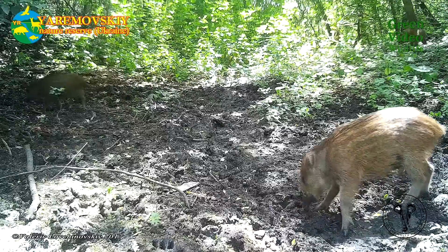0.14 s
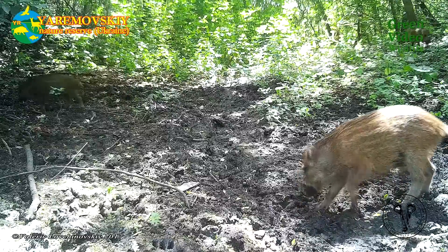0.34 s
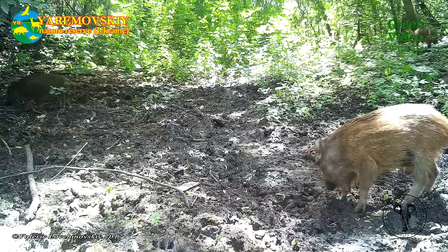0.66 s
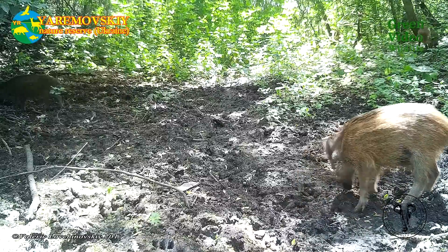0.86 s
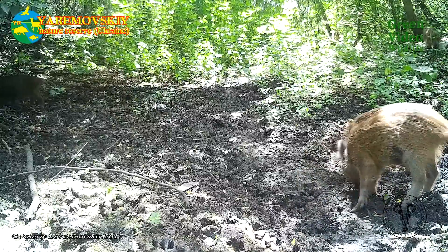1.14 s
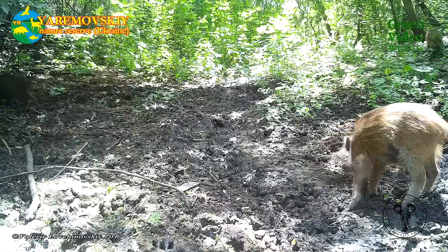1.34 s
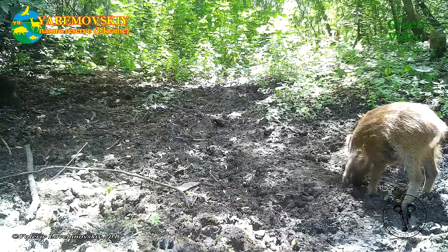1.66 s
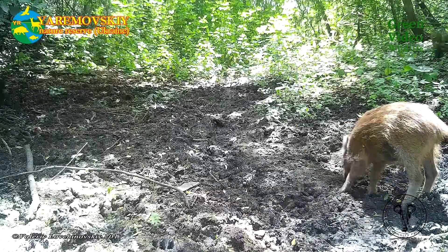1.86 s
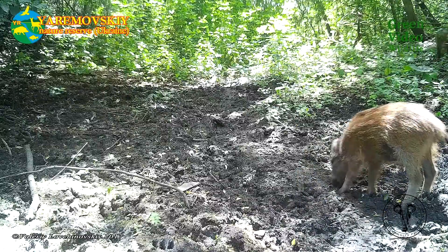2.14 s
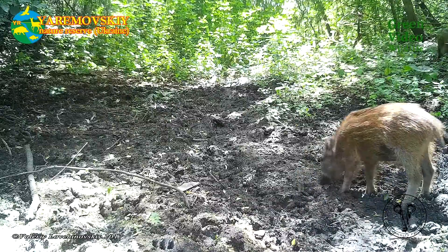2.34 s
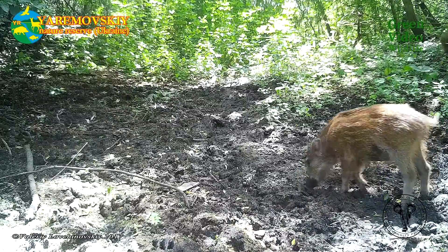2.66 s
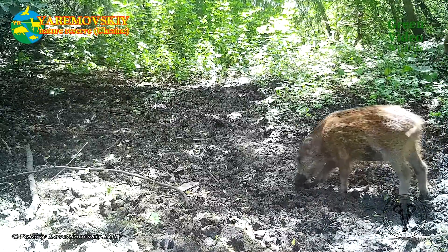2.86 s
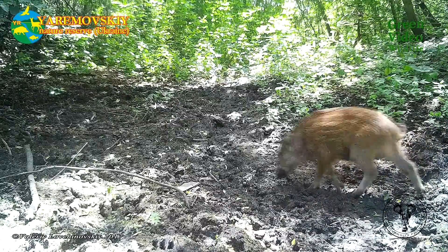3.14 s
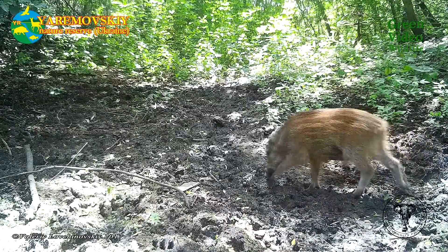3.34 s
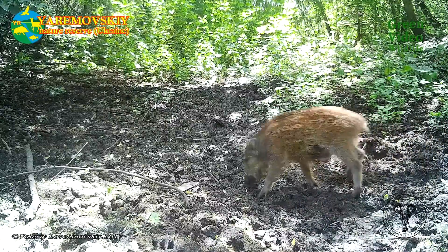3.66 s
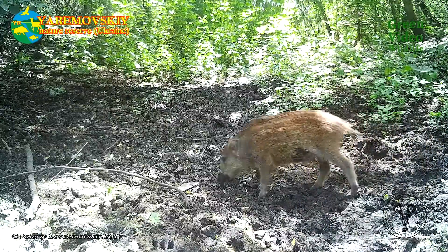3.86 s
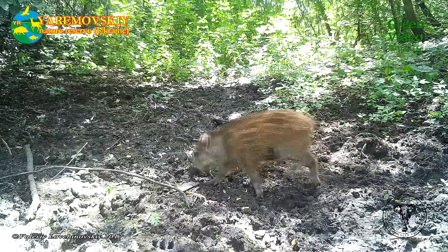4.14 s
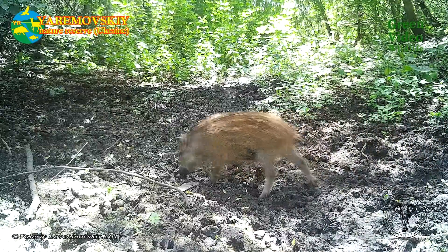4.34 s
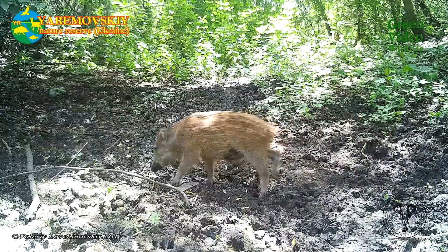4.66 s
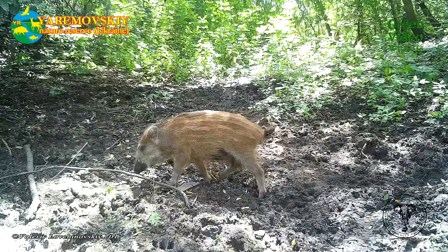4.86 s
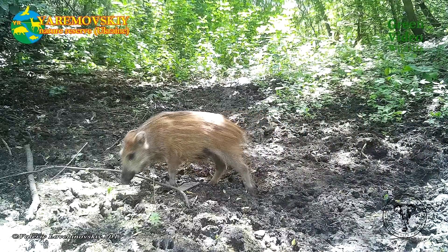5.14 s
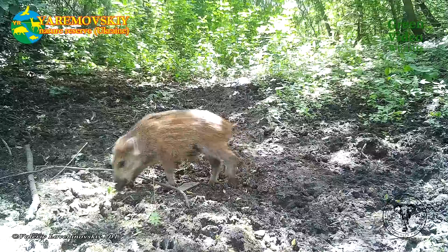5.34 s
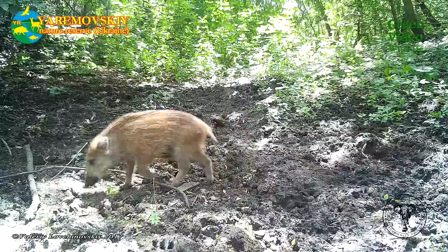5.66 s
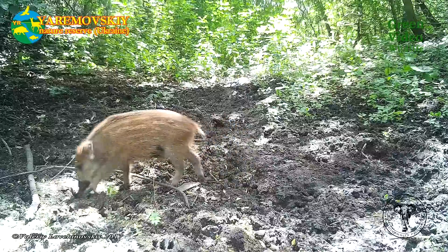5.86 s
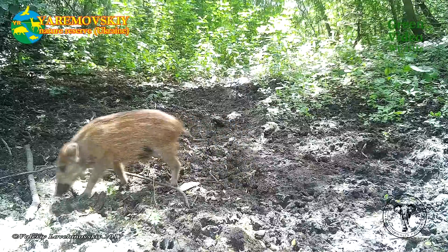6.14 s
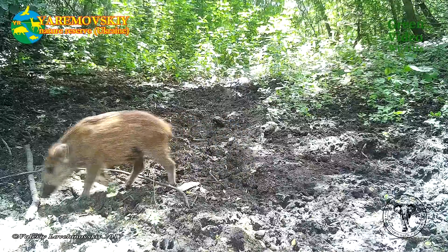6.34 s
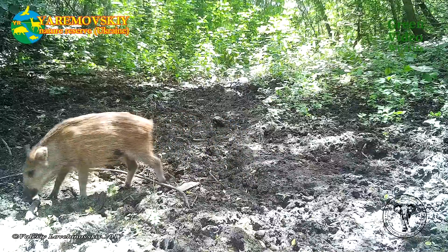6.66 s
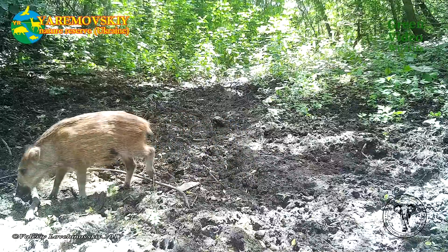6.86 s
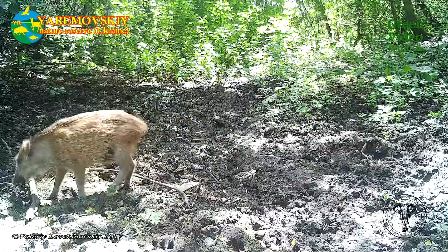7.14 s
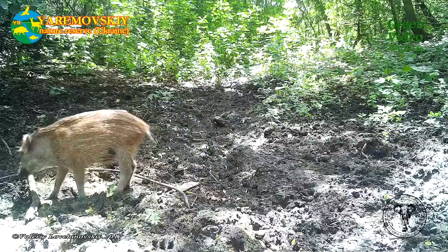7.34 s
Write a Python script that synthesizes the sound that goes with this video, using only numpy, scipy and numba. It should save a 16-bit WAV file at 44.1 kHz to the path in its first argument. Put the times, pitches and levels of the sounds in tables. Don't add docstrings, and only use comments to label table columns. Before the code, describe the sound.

Close, uneven piglet grunts with wet snout snaps and two fluttering snorts give way to small twig ticks and crunches in steadily hissing woodland.

```python
import sys
import numpy as np
from scipy import signal
from scipy.fft import rfft, irfft, next_fast_len
from scipy.io import wavfile
from scipy.ndimage import uniform_filter1d, minimum_filter1d, map_coordinates
from numba import njit

SR = 44100
rng = np.random.default_rng(int(sys.argv[2]) if len(sys.argv) > 2 else 0)


def gain_from_db(level_db):
    decades = np.asarray(level_db, float) / 20
    return 10 ** decades


def wrap_up_sound(samples):
    columns = np.atleast_2d(samples).T
    tamed = np.clip(columns, -1, 1)
    steps = np.round(tamed * 32767).astype(np.int16)
    wavfile.write(sys.argv[1], SR, steps)


N = 331191

# start_s, hold_s, fade_30db_s, nasal_ring_db, nostril_air_re_ring_db
GRUNT_TIMING = [(0.034, 0.089, 3, -33, -11), (0.171, 0.054, 0.06, -12.5, -10),
                (0.578, 0.036, 0.15, -14, -5), (0.864, 0.052, 0.14, -14.5, -11),
                (1.151, 0.047, 0.09, -17.5, -9), (1.446, 0.03, 0.12, -19, -9),
                (1.797, 0.062, 0.2, -18, -15), (2.383, 0.033, 0.08, -17, -4.5),
                (2.758, 0.028, 0.19, -13, -10), (3.124, 0.044, 0.08, -14.5, -10.5),
                (4.031, 0.0692, 0.1, -24, -6), (4.46, 0.0094, 0.1, -14, -13),
                (4.746, 0.046, 0.09, -18.5, -12)]
# nasal_start_hz, nasal_end_of_hold_hz, sinus_hz, sinus_db, nostril_hz
GRUNT_NOSE = [(272.7, 274, 370, -23, 5800), (333.4, 355, 510, -7, 5370), (339.8, 346, 454, -13.5, 4750),
              (350, 400, 500, 0, 5100), (459.2, 520, 637, 0.5, 5060), (474.1, 488, 654, -1.5, 5300),
              (488.9, 470, 520, -6, 5200), (334.5, 390, 570, -3.5, 4880), (440, 442, 318, -1, 4480),
              (365, 400, 480, -1, 4500), (373, 403, 665, -10.5, 4660), (388.7, 410, 735, -18, 4560),
              (323, 360, 595, -12, 4870)]
# opening_re_ring_db, low_hz, middle_hz, high_hz, low_over_high_db
GRUNT_MOUTH = [(-22, 1200, 1920, 2400, 2), (-17.5, 1270, 1550, 2690, -1), (-15.5, 1280, 2020, 2510, 2.5),
               (-12, 980, 1752, 2240, 1), (-11.5, 1270, 1990, 2490, -4), (-14, 2330, 2520, 3250, 0),
               (-15, 1700, 2140, 2330, 2), (-10.5, 1340, 2020, 2340, 8.5), (-14.5, 1143, 1654, 2090, 0.5),
               (-11, 1170, 1680, 1950, 9), (-17.5, 1200, 1890, 2430, 14), (-18, 1100, 1693, 2020, 0),
               (-22, 1040, 1850, 2300, 15)]
# steady_whistle_share (0-1), octave_db, palate_hz, palate_re_middle_mouth_db,
# mouth_sag_per_s
GRUNT_VOICE = [(0.2, -20, 3000, -20, .4), (0.7, -14, 2200, -3, 0.49), (0.3, -11.5, 930, -5, 0.26),
               (.6, -11, 1150, -0.5, -.6), (.1, -22, 3250, -3, -.4), (.2, -20, 1850, -8, .4),
               (.35, -24, 1150, -7, .8), (0.5, -8, 3600, -10, .4), (0.07, -19, 2700, -9, 0.45),
               (.2, -7.5, 2400, -10, .05), (0.12, -17, 1077, -8, .4), (0.54, -13.5, 2250, -5, .4),
               (0.6, -11, 2900, -7, 0.21)]
# start_s, length_s, level_db
LEAD_INS = [
    (0.56, 0.02, -21.5),
    (2.737, 0.021, -27),
    (4.423, 0.027, -14.5),
    (4.449, .011, -22),
]
# time_s, level_db
NOSTRIL_SNAPS = [(0.1875, -6), (0.195, -25), (0.2048, -6), (0.213, -20), (.5784, -6), (.631, -4),
                 (0.65, -4), (0.9145, -8), (0.9205, -5), (.93, -13), (.95, -2), (0.9558, -5), (1.1553, -11),
                 (1.161, -7), (2.387, -17), (2.4082, -9), (2.802, -15), (3.1253, -14), (3.142, -14),
                 (3.295, -14), (4.0445, -9), (4.07, -4), (1.918, -10), (1.9213, -6), (4.7742, -9),
                 (4.7814, -3), (4.789, -7)]
# time_s, nostril_db, mouth_db
LIP_SMACKS = [(.5871, 1.5, -11), (.6035, -14, -17), (.6092, -9, -11), (.6222, -3, -13.5),
              (.8697, -8.5, -12.5), (.8939, -20, -12.5), (1.1728, -10, -12), (1.1815, -11, -11),
              (1.1925, -10, -10.5), (1.4642, -12, -12), (1.467, -7, -13), (1.4735, -13, -16),
              (1.4936, -16, -12), (1.8005, -33, -12), (1.8068, -14, -11), (1.8125, -3, -12),
              (1.8185, 3, -13), (1.836, -11, -2), (1.8409, -29, -27), (2.3934, -16, -16),
              (2.4246, -20, -15), (2.765, -1.5, -3), (2.786, -12, -6.5), (3.1542, -23, -17),
              (3.1573, -13, -10.5), (4.4625, -5, -8)]
# time_s, peak_db
HARD_FLAPS = [(1.1512, -1), (1.157, -2), (1.166, 0), (1.1722, 3), (1.194, 4), (1.4475, -3), (1.4575, -4),
              (1.4635, 2), (1.491, 1), (1.4954, 2), (1.8, -3), (1.8062, -1), (1.8125, -6), (1.8215, -2),
              (1.833, 0), (1.856, 1), (2.386, -2), (2.763, 4.5), (2.781, 7), (3.125, 0.5), (3.159, 0),
              (4.0415, -6), (4.05, -5), (4.068, 3), (4.092, -6), (4.8085, -3), (4.422, -29), (4.461, 7.5)]
# time_s, share
NOSTRIL_FLARE = [(0, 0.19), (2.5, 0.35), (2.7, 0.29), (4.6, 0.24), (4.7, .12)]
# time_s, effort_db, mouth_hz, tongue_hz
SNORT_PATHS = [
    [(1.9, -36, 1400, 1950), (1.917, -24, 1410, 1960), (1.938, -23, 1420, 1980), (1.956, -21, 1414, 2000),
     (1.995, -24.5, 1420, 2050), (2.02, -24, 1436, 2380), (2.096, -24, 1510, 2660),
     (2.155, -25, 1540, 2800), (2.177, -19.5, 1546, 2870), (2.196, -31, 1570, 2900)],
    [(3.19, -30.5, 1118, 2400), (3.248, -31.5, 1290, 2500), (3.298, -27.5, 1420, 2600),
     (3.342, -31.5, 1580, 2950), (3.38, -45, 1640, 3000)],
]
# centre_hz, width_hz, level_db
SNORT_CHEST = [
    (271, 35, 4),
    (373, 35, 11),
    (518, 30, 1),
]
# centre_hz, width_hz, level_db
SNORT_NOSTRIL = [
    (3800, 130, -5),
    (4690, 740, 4.5),
    (5220, 380, 6),
    (6200, 480, -7),
    (7500, 720, -6),
    (10600, 2600, -30),
]
# time_s, level_db, pitch_hz
SNORT_GROAN = [
    [(3.195, -33, 215), (3.215, -29, 225), (3.235, -30.5, 235), (3.25, -29.5, 200), (3.28, -30, 179),
     (3.315, -33, 155), (3.335, -45, 145)],
    [(3.35, -43, 110), (3.368, -30, 100), (3.385, -45, 95)],
]
# time_s, level_db, pitch_hz
CHEST_SIGH = [
    (2.198, -48, 125),
    (2.22, -23, 111),
    (2.245, -50, 100),
]
# time_s, level_db, pitch_hz
SOFT_VOICE = [
    (.03, -40, 260),
    (.045, -27, 252),
    (.07, -38, 255),
    (.09, -27, 263),
    (.125, -38, 249.4),
]
# time_s, level_db, pitch_hz
RING_AGAIN = [
    [(.229, -35, 290), (.237, -23, 280), (.243, -20, 275), (.248, -44, 270)],
    [(2.417, -47, 540), (2.425, -13.5, 549.7), (2.432, -15, 536), (2.437, -35, 543), (2.455, -29, 544),
     (2.5, -40, 586)],
    [(3.172, -35, 410), (3.18, -21, 380), (3.188, -25, 340), (3.194, -30, 300)],
]
# time_s, level_db, pitch_hz
UNDERVOICE = [
    (1.914, -40, 84),
    (1.93, -31, 85),
    (1.96, -28, 88),
    (1.986, -34, 87.8),
    (2.002, -30.5, 86.4),
    (2.066, -31.5, 89.5),
    (2.11, -32, 88),
    (2.175, -30, 92.4),
    (2.196, -42, 92.7),
]
# multiple, level_db
UNDERVOICE_OVERTONES = [(2, -2), (3, 0), (4, -4), (5, -7), (6, 0), (7, -2), (8, -10), (9, -14)]
# time_s, peak_db, centre_hz, spread_octaves
TWIG_TICKS = [(0.1837, -11, 10800, .55), (0.2753, -13.5, 9300, .43), (0.587, -11, 10190, .5),
              (0.7455, -6.5, 9500, .8), (0.8074, -13, 8000, .8), (0.8700, -4.5, 8060, .7),
              (1.4661, -11, 8000, .8), (1.8176, -12, 11000, 0.82), (1.9126, -11, 10000, .6),
              (2.5676, -9.5, 10300, .39), (2.802, -7, 6160, .52), (3.1916, -11, 10000, .36),
              (3.4286, -11, 6200, .3), (3.46, -5, 6050, .52), (3.506, -9, 6200, .63),
              (3.6361, -8, 3800, 1.1), (3.7863, -15, 10000, .5), (3.8144, -11, 6200, .49),
              (4.047, -3, 9400, 0.72), (4.4268, -10, 8000, .5), (5.0765, -7, 5000, .18),
              (5.0775, -5.5, 9500, .6), (5.125, -12, 6000, .8), (5.152, -13.5, 10000, .5),
              (5.4939, -10, 9167, .53), (6.2213, -12.5, 6170, .34), (6.941, -7.5, 4800, 0.84),
              (7.3248, -13, 8000, .8)]
# time_s, level_db, length_s, centre_hz
LITTER_CRUNCHES = [(0.996, -29, 0.013, 7000), (1.134, -28, 0.0087, 2500), (1.93, -22, 0.011, 4400),
                   (5.39, -30, .012, 8300), (5.048, -26, .012, 5900), (2.288, -31, 0.03, 6300),
                   (1.99, -32, .06, 8500), (.62, -33, 0.037, 7200), (2.8, -34.5, .04, 9600),
                   (4.5, -36, 0.13, 7000), (1.55, -38, .06, 10000), (3.504, -26, 0.038, 5600),
                   (3.641, -29.5, 0.018, 2700), (4.78, -36, 0.017, 8050), (4.876, -30, 0.045, 6700),
                   (5.052, -32, 0.2, 6100), (5.235, -27, 0.041, 4900), (5.357, -29.5, 0.025, 6200),
                   (5.567, -23, 0.031, 5600), (5.904, -29.5, 0.054, 3800), (6.079, -29.5, 0.049, 5300),
                   (6.784, -31.5, 0.078, 7300), (7.2, -33, 0.062, 6100)]
# time_s, level_db, length_s, centre_hz
NOSTRIL_SNIFFS = [
    (1.775, -34, 0.15, 7500),
    (4.783, -30.5, .02, 7650),
]
# time_s, level_db
BREEZE = [(0, -32), (.37, -34), (.608, -35.5), (.778, -30.5), (1.212, -32.5), (1.75, -32), (2.28, -31.5),
          (2.54, -34), (3.36, -30.5), (3.87, -31.5), (4.8, -31), (4.99, -30), (5.82, -30), (6.2, -31.5),
          (6.94, -30), (7.51, -32.5)]
# frequency_hz, density_db
LEAF_SPECTRUM = [(410, -20), (700, -1), (728, -4.5), (1330, -3), (2430, -1), (3790, 0), (9350, -6),
                 (14600, -23), (15400, -26), (16000, -75)]
# frequency_hz, density_db
RUMBLE_SPECTRUM = [(12, -41), (20, -1.5), (80, -4.5), (251, -5.5), (335, -8.5), (536, -9.5), (677, -14),
                   (1500, -17.5), (1950, -25.5), (3300, -120)]


def unit(x):
    return x / np.sqrt(np.mean(x ** 2) + 1e-20)


def curves(tables):
    s, db, *cols = np.transpose([row for table in tables for row in table])
    t = np.arange(N) / SR
    on = sum((t >= table[0][0]) & (t <= table[-1][0]) for table in tables) > 0
    level = gain_from_db(np.interp(t, s, db)) * uniform_filter1d(on * 1., size=90)
    return [level] + [np.interp(t, s, c) for c in cols]


def wobble(rate):
    return map_coordinates(rng.standard_normal(int(N * rate / SR) + 4), [np.arange(N) * rate / SR])


def filtered(x, response):
    m = next_fast_len(N + 8192)
    return irfft(rfft(x, m) * response(np.fft.rfftfreq(m, 1 / SR)), m)[:N]


def modes(x, table):
    def response(f):
        total = 0
        for k, (centre, width, db) in enumerate(table):
            damping = 1j * f * width
            total = total + (-1) ** k * gain_from_db(db) * damping / (centre * centre - f * f + damping)
        return total
    return filtered(x, response)


@njit
def resonate(x, cosine, r):
    y = np.zeros(len(x))
    for i in range(2, len(x)):
        y[i] = x[i] - x[i - 2] + 2 * r * cosine[i] * y[i - 1] - r * r * y[i - 2]
    return y


def cavity(x, hz, width_hz):
    for w in (width_hz, 3 * width_hz):
        r = np.exp(-np.pi * w / SR)
        x = resonate(x, np.cos(2 * np.pi * hz / SR), r) * (1 - r * r) / 2
    return x


def even(x, span_s):
    return x / np.sqrt(np.abs(uniform_filter1d(x * x, int(span_s * SR))) + 1e-3 * np.mean(x * x))


def flaps(rate_hz, jitter, scatter_db, pattern_db=(0,)):
    speed_hz = rate_hz * np.clip(1 + jitter * wobble(150), .2, 3)
    turn = np.cumsum(speed_hz).astype(int) // SR
    size = gain_from_db(scatter_db * rng.standard_normal(N) + np.resize(pattern_db, N))
    return np.diff(turn, prepend=0) * size[turn]


def gated(pulses, decay_s):
    return signal.lfilter([1], [1, -np.exp(-1 / (decay_s * SR))], pulses) * rng.standard_normal(N)


def clicks(s, db):
    return np.bincount(np.round(s * SR).astype(int), gain_from_db(db), N)


def grunts():
    t = np.arange(N) / SR
    now = np.maximum(np.searchsorted(np.array(GRUNT_TIMING)[:, 0] - .05, t) - 1, 0)
    start, hold, fade, ring_db, air_db = np.array(GRUNT_TIMING)[now].T
    open_hz, close_hz, sinus_hz, sinus_db, nostril_hz = np.array(GRUNT_NOSE)[now].T
    steady, octave_db, palate_hz, palate_db, sag_per_s = np.array(GRUNT_VOICE)[now].T
    mouth_db, *jaw_hz, tilt_db = np.array(GRUNT_MOUTH)[now].T
    age = t - start
    nasal_hz = open_hz + (close_hz - open_hz) * np.clip(age / hold, -3, 1.8)
    sag = 1 - sag_per_s * np.clip(age - hold / 2, -.05, .08)
    low_hz, mid_hz, high_hz, palate_hz = np.array(jaw_hz + [palate_hz]) * sag
    flare = np.interp(t, *np.transpose(NOSTRIL_FLARE))

    def swell(db, rise_db, rise_s, lag_s, slower):
        below_db = rise_db * np.clip(1 - age / rise_s, 0, 1)
        fade_db = 30 * (np.maximum(age - hold - lag_s, 0) / (slower * fade)) ** 1.04
        return gain_from_db(ring_db + db - (below_db + fade_db)) * np.clip(age / .002, 0, 1)

    def nose(x):
        ring = cavity(x, nasal_hz, width_hz=79.0)
        sinus = gain_from_db(sinus_db) * cavity(x, sinus_hz, width_hz=57)
        return ring + sinus + 0.039 * cavity(x, 1.92 * nasal_hz, width_hz=390)

    def mouth(x):
        side_db = -3
        y = gain_from_db(side_db + tilt_db / 2) * cavity(x, low_hz, width_hz=55)
        y -= cavity(x, mid_hz, width_hz=100)
        y += gain_from_db(side_db - tilt_db / 2) * cavity(x, high_hz, width_hz=140)
        y += gain_from_db(palate_db) * cavity(x, palate_hz, width_hz=62)
        return y - gain_from_db(-15) * cavity(x, np.full(N, 2900), width_hz=550)

    def nostril(x):
        sides = cavity(x, 0.866 * nostril_hz, width_hz=670) + cavity(x, 1.06 * nostril_hz, width_hz=1440)
        return cavity(x, nostril_hz, width_hz=280) - flare * sides

    push = flaps(np.full(N, 125.), jitter=.45, scatter_db=4)
    drive = unit(push) + .4 * unit(gated(push, decay_s=.004))
    puffs = gated(push + 0.0036, decay_s=0.002)

    phase = 2 * np.pi * np.cumsum(nasal_hz * (1 + .03 * wobble(70))) / SR
    whistle = gain_from_db(1 + 2.5 * wobble(70)) * (np.sin(phase) - gain_from_db(octave_db) * np.cos(2 * phase))
    steady = np.clip(steady, 0, 1)
    ring = np.sqrt(1 - steady) * even(nose(drive), span_s=0.0097) + np.sqrt(steady) * whistle
    lead_in = sum(gain_from_db(db) * ((t > s) & (t < s + length)) for s, length, db in LEAD_INS)
    lead_in = uniform_filter1d(lead_in, size=90)
    attack_s = 0.009
    voice = (swell(0, 6.5, attack_s, lag_s=0, slower=0.54) + lead_in) * ring

    chest = modes(modes(drive, [(129, 59, -1.1), (293, 95, -2)]), [(170, 460, 0)])
    voice += swell(-8.5, 5.5, hold, lag_s=0.0085, slower=1) * even(chest, span_s=0.0295)
    oral = even(mouth(drive + .5 * unit(puffs)), span_s=0.024)
    voice += swell(mouth_db, 13, attack_s, lag_s=-0.0055, slower=1.24) * oral
    air = even(nostril(puffs), span_s=0.039)
    voice += swell(-4 + air_db, 23, attack_s, lag_s=0.002, slower=1.23) * air

    wet = LIP_SMACKS + [(s, db, db - 17) for s, db in NOSTRIL_SNAPS]
    s, snap_air_db, snap_mouth_db = np.transpose(wet)
    spit, smack = clicks(s, snap_air_db), clicks(s, snap_mouth_db)
    snaps = gain_from_db(27.0) * nostril(spit + 0.14 * gated(spit, decay_s=0.00059))
    snaps += gain_from_db(32.5) * mouth(smack + 0.12 * gated(smack, decay_s=0.00057))
    thumps = gain_from_db(31.5) * cavity(clicks(*np.transpose(HARD_FLAPS)), 1.014 * nasal_hz, width_hz=68)
    return voice + snaps - thumps


def snorts():
    t = np.arange(N) / SR
    body, mouth_hz, tongue_hz = curves(SNORT_PATHS)
    effort_db = np.clip(20 * np.log10(body + 1e-9) + 25, -9, 9)
    flutter_hz = 87.7 + 0.5 * effort_db
    air_db = 1.6 + 0.76 * effort_db
    nostril_hz = 4950 + 14 * effort_db
    flare = np.interp(t, *np.transpose(NOSTRIL_FLARE))
    push = flaps(3 * flutter_hz, jitter=.06, scatter_db=2.5, pattern_db=(0, -3, -5))
    drive = unit(push) + .3 * unit(gated(push, decay_s=.002))
    every_third = (push > 0) * (np.cumsum(push > 0) % 3 == 0)
    cycle = .5 * unit(every_third) + drive

    chest = cavity(modes(cycle, SNORT_CHEST), np.full(N, 280.), width_hz=680)
    chest += 2.16 * cavity(cycle, np.full(N, 168.), width_hz=79)
    throat = cavity(cavity(cycle, 0.391 * mouth_hz, width_hz=108), 0.389 * mouth_hz, width_hz=250)
    low = even(2 * flare * chest + 1.5 * gain_from_db(3.3 * wobble(35)) * throat, span_s=0.02)
    low *= gain_from_db(-4 * (t < 3))

    mouth = cavity(drive, mouth_hz, width_hz=65) + 0.42 * cavity(drive, tongue_hz, width_hz=170)
    mouth += 0.3 * cavity(drive, np.full(N, 3130.), width_hz=160)
    mouth += 0.07 * cavity(drive, 1.72 * mouth_hz, width_hz=220)
    spit = unit(push * gain_from_db(1.5 * wobble(120))) + 0.6 * unit(gated(push + 0.001, decay_s=0.001))
    air = flare * modes(spit, SNORT_NOSTRIL) + cavity(spit, nostril_hz, width_hz=750)
    blown = low + gain_from_db(-6.5) * even(mouth, span_s=0.044) + gain_from_db(air_db) * even(air, span_s=0.0297)
    return body * blown + voiced_tones()


def voiced_tones():
    level, pitch_hz = curves(sorted([SOFT_VOICE, CHEST_SIGH] + SNORT_GROAN + RING_AGAIN))
    return level * np.sqrt(2) * np.sin(2 * np.pi * np.cumsum(pitch_hz * (1 + 0.05 * wobble(60))) / SR)


def hum():
    level, pitch_hz = curves([UNDERVOICE])
    phase = 2 * np.pi * np.cumsum(pitch_hz * (1 + .012 * wobble(40))) / SR
    overtones = sum(gain_from_db(db + 3.5 * wobble(45)) * np.sin(round(k) * phase) for k, db in UNDERVOICE_OVERTONES)
    return level * np.sqrt(2) * overtones


def burst(n, hz, spread):
    f = np.fft.rfftfreq(n, 1 / SR) + 1
    band = np.exp(-.5 * (np.log2(f / hz) / spread) ** 2) / (1 + (f / 11000) ** 4)
    return unit(irfft(rfft(rng.standard_normal(n)) * band, n))


def litter():
    out, t = np.zeros(N + SR), np.arange(8192) / SR
    for s, db, hz, spread in TWIG_TICKS:
        tick = gain_from_db(-60 * t[:4096] / 0.011)
        lingering = gain_from_db(-16.5 - 60 * t[:4096] / 0.24)
        level = max(gain_from_db(db - 9.0) - .03, 0)
        out[round(s * SR):][:4096] += level * (tick + lingering) * burst(4096, hz, spread)
    crunches = [(*row, 0.66) for row in LITTER_CRUNCHES]
    sniffs = [(*row, .16) for row in NOSTRIL_SNIFFS]
    for s, db, length, hz, spread in crunches + sniffs:
        grain = gain_from_db(2.6 * uniform_filter1d(rng.standard_normal(8192), size=60) * np.sqrt(60))
        swell = np.exp(-4 * ((t - t[4096]) / length) ** 2)
        out[round(s * SR) - 4096:][:8192] += gain_from_db(db) * swell * unit(grain) * burst(8192, hz, spread)
    return out[:N]


def rush(spectrum, patchy_db):
    z = signal.stft(rng.standard_normal(N + 512), nperseg=512)[2]
    field = uniform_filter1d(rng.standard_normal(z.shape), size=8, axis=0)
    field = uniform_filter1d(field, size=10, axis=1)
    noise = signal.istft(z * gain_from_db(patchy_db * unit(field)), nperseg=512)[1][:N]
    f, db = np.transpose(spectrum)
    return unit(filtered(noise, lambda hz: gain_from_db(np.interp(np.log(hz + 1), np.log(f), db))))


def forest():
    breeze_db = np.interp(np.arange(N) / SR, *np.transpose(BREEZE))
    ticks = (rng.random(N) < 25 / SR) * gain_from_db(np.minimum(3 * rng.exponential(size=N), 3))
    leaves = rush(LEAF_SPECTRUM, patchy_db=.6) * (1 + .16 * signal.lfilter([1], [1, -.992], ticks))
    leaves *= gain_from_db(breeze_db + .7 * wobble(4.8))
    rumble = gain_from_db(.5 * wobble(6)) * rush(RUMBLE_SPECTRUM, patchy_db=.6)
    rumble_db = -34.5 + 0.78 * (breeze_db - breeze_db.mean())
    return leaves + gain_from_db(rumble_db) * rumble


def scene():
    boar = grunts() + snorts()
    tail = rng.standard_normal(8000) * gain_from_db(-60 * np.arange(8000) / SR / 0.099)
    scattered = gain_from_db(-23) * signal.fftconvolve(boar, tail / np.linalg.norm(tail))[:N]
    near = boar + scattered + litter() + forest() + hum()
    return np.array([near, near])


def roll_off(x):
    return signal.sosfilt(signal.butter(12, 16330, fs=SR, output="sos"), x)


def record(dry):
    clipped = np.clip(dry[0], -1, 1)
    top = filtered(clipped, lambda hz: (hz > 15200) * (hz < 16300))
    power = uniform_filter1d(top ** 2, size=256)
    loud = power > np.median(power) * gain_from_db(17) ** 2
    gate = -minimum_filter1d(-1. * loud, size=500)
    mono = filtered(clipped, lambda hz: hz <= 15200)
    mono = mono + top * (.03 + .5 * uniform_filter1d(gate, size=200))
    hz, t, z = signal.stft(mono, SR, nperseg=2048)
    low_hz, chance = 4500 * 3 ** rng.random(len(t)), rng.random(len(t))
    patch = (chance < .09) & (hz[:, None] > low_hz) & (hz[:, None] < 1.4 * low_hz)
    scrambled = patch * z * np.exp(2j * np.pi * rng.random(z.shape))
    side = gain_from_db(-5.5) * signal.istft(scrambled, SR, nperseg=2048)[1][:N]
    return roll_off(np.array([mono + side, mono - side]))


dry = scene()
out = record(dry)
wrap_up_sound(out)
```